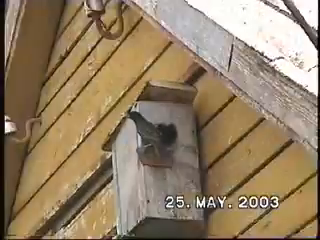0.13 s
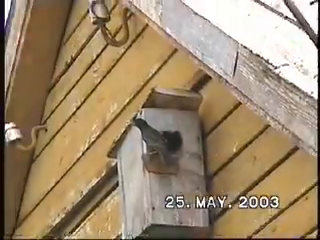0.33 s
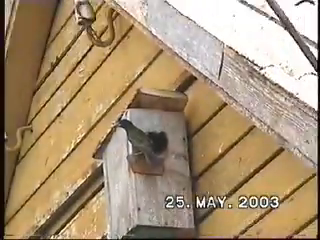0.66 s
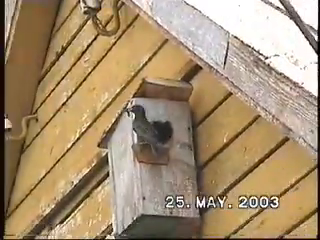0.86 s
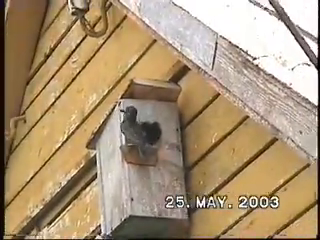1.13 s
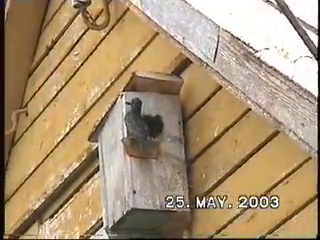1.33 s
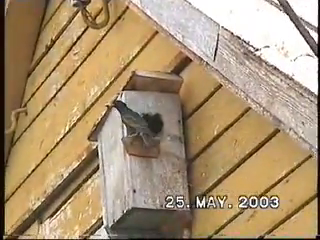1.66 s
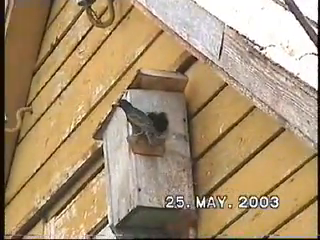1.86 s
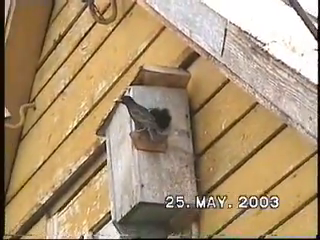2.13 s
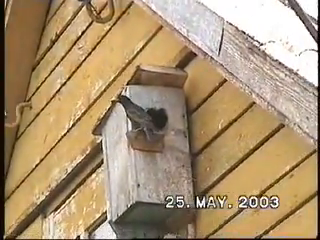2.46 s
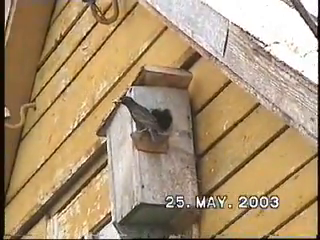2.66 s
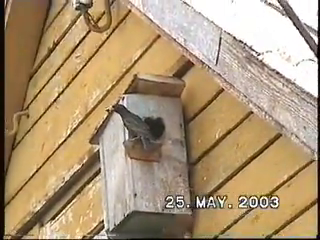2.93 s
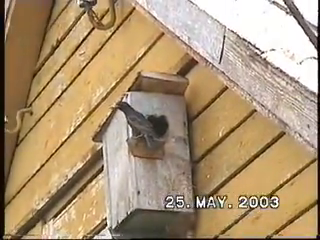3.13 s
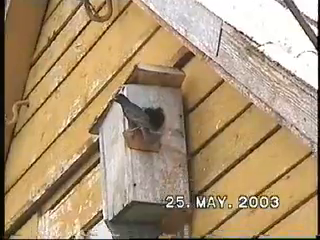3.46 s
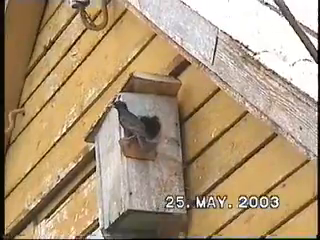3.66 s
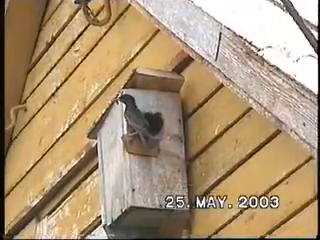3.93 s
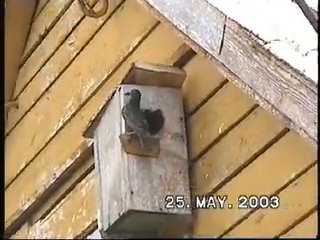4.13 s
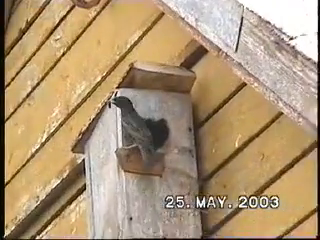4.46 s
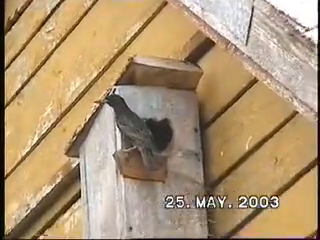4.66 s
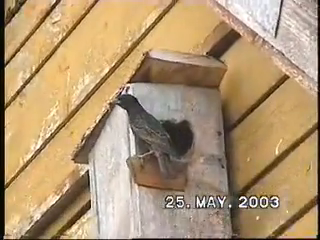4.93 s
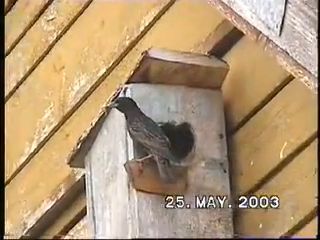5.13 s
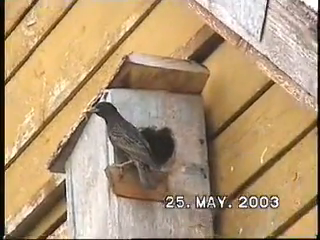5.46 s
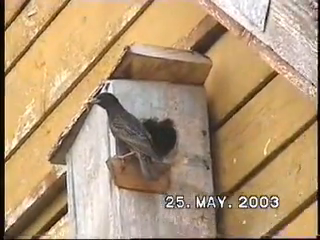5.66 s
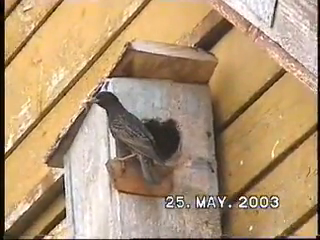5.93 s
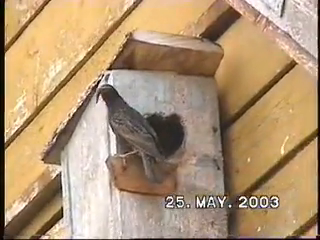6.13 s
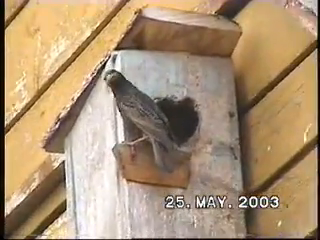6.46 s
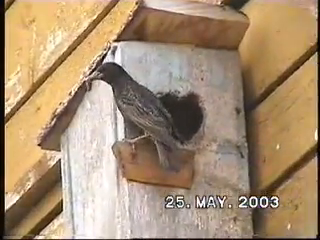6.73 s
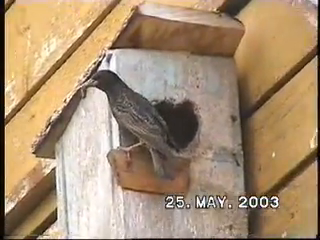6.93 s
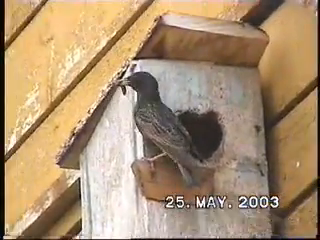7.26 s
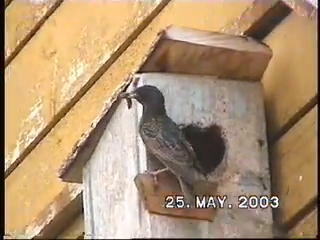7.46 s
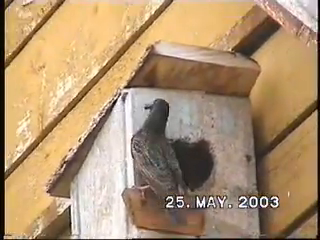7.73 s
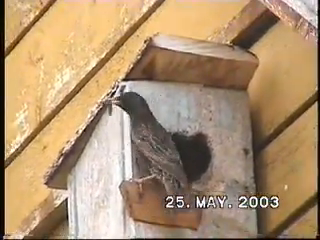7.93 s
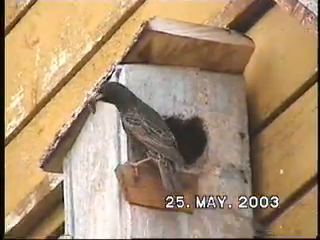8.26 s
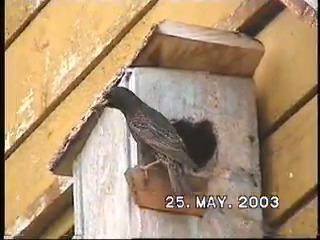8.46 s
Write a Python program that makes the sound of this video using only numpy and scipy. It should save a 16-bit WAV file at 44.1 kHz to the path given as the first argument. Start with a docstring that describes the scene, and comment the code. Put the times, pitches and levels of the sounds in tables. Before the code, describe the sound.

Short, bright starling chips and three rasping churrs, a hoarse four-part rooster crow, faint distant birds and hens, low gusts thumping the microphone.

```python
"""A yard with a wooden gable: a starling on its nest box gives sharp alarm chips and three harsh churrs.
A rooster crows across the yard in four syllables; small birds and hens call far off.
Chips and crow are harmonic series shaped by throat resonances, churrs are pulsed noise, far calls are
gliding sines, and a light wooden knock is a set of damped modes.
Gusts, as low-passed noise, buffet the microphone over a steady wash and a faint high whistle."""
import sys
import numpy as np
from scipy import signal
from scipy.fft import rfft, irfft, next_fast_len
from scipy.io import wavfile

SR = 44100
rng = np.random.default_rng(int(sys.argv[2]) if len(sys.argv) > 2 else 0)


def wav_record(signal):
    """Record a signal, one row per channel, as 16-bit PCM in the file named by sys.argv[1]."""
    frames = np.transpose(np.atleast_2d(signal))
    bounded = np.clip(frames, -1, 1)
    # unit amplitude maps onto the largest positive 16-bit level
    quanta = np.round(bounded * 32767).astype(np.int16)
    wavfile.write(sys.argv[1], SR, quanta)


N = 379701
T = np.arange(N) / SR

# the crow's syllables: start_s, length_s, release_s, fundamental_db, octave_db (before a trim),
# octave_swell_db, steady_rasp_db (before trims), pitch_hz, overshoot_hz, overshoot_after_s
CROW_SYLLABLES = [(2.646, 0.202, 0.095, -39, -19, 7, -31.5, 679, 24.7, .1),
                  (2.968, 0.2625, 0.079, -20, -16, 0, -34, 730, 57.94, 0.1),
                  (3.213, .42, 0.085, -19, -18.5, 8.5, -34, 744.5, 57.76, .105),
                  (3.718, .9, 0.24, -21.5, -20.5, 15.5, -69, 726.7, 42.2, 0.031)]
BREAK_RELEASE_S = 0.035


def amp(db):
    """Level law: decibels to amplitude gain."""
    return 10 ** (np.asarray(db) / 20)


def unit(x):
    """Normalization: scales to rms 1."""
    return x / np.sqrt(np.mean(x ** 2) + 1e-20)


def read(points, hz):
    """Spectral envelope: interpolates a table on a log-frequency axis."""
    f, value = np.transpose(points)
    return np.interp(np.log(hz + 1), np.log(f + 1), value)


def colour(x, points):
    """Linear filtering: weights the spectrum of x by a table, then scales to rms 1."""
    gain = amp(read(points, np.fft.rfftfreq(len(x), 1 / SR)))
    return unit(irfft(rfft(x) * gain, len(x)))


def wander(n, hz):
    """Band-limited random modulation: smooth noise with rates up to about hz, rms near 1."""
    size = next_fast_len(n + 4096)
    f = np.fft.rfftfreq(size, 1 / SR)
    spectrum = rfft(rng.standard_normal(size)) * np.exp(-(f / hz) ** 2)
    return unit(irfft(spectrum, size))[:n]


def swell(t, start, hold, rise, fall):
    """Exponential envelope: grows toward start, holds at 1, then decays."""
    return np.exp(np.minimum(t - start, 0) / rise - np.maximum(t - start - hold, 0) / fall)


def gate(t, length, attack, release):
    """Linear envelope: straight attack, hold and release within a length."""
    return np.clip(np.minimum(t / attack, (length - t) / release), 0, 1)


def add(mix, s, sound):
    """Superposition: adds a sound to the mix at time s."""
    part = mix[max(round(s * SR), 0):][:len(sound)]
    part += sound[:len(part)]


def echoes(x, t60, delay):
    """Diffuse reflection: sparse random echoes begin after a delay and decay by 60 dB in t60; energy 1."""
    t = np.arange(SR) / SR
    sparse = rng.choice([-1., 1.], SR) * (rng.random(SR) < 1 / 10)
    taps = sparse * amp(-60 * t / t60) * (t > delay)
    return signal.oaconvolve(x, taps / np.linalg.norm(taps))[:N]


def starling(gable_db=-11, yard_db=-23):
    """Reflection: chips and churrs are thrown back by the gable close behind and by the yard."""
    # alarm chips: start_s, length_s, level_db, final_pitch_hz, beak_factor on the throat's frequencies,
    # held_note (0-1)
    chip_rows = [(0.532, 0.054, -16.5, 1200, 0.99, 0.4), (0.921, 0.055, -12, 1287, 0.95, 0.8),
                 (1.639, 0.06, -17.5, 1232, 1, 0), (1.905, 0.057, -14, 1324, 1, 1.0),
                 (3.864, 0.059, -21.5, 1138, 0.96, 0), (4.527, 0.046, -19, 1145, 0.92, 0.25),
                 (5.113, 0.054, -16, 1230, 0.99, 0.4), (5.52, 0.058, -14.5, 1304, 1, 0.5),
                 (6.742, 0.05, -15.5, 1317, 0.95, 0.8), (7.284, 0.052, -20, 1186, 0.95, 0),
                 (7.646, 0.05, -14.5, 1267, 0.89, 1), (7.988, 0.064, -19, 1236, 0.86, 0.3),
                 (8.231, 0.063, -16.5, 1316, 0.95, 0.93)]
    # churrs: start_s, length_s, level_db and low_resonance_db (each before a trim) with the fade
    # between them, in the order start_s, length_s, level_db, fade_db, low_resonance_db
    churr_rows = [(2.19, 0.34, -28.5, -9, -41), (6.194, .34, -35, -4, -36.5), (8.392, .26, -36, -1, -42)]
    dry = np.zeros(N)
    for s, *shape in chip_rows:
        add(dry, s, chip(*shape))
    for s, *shape in churr_rows:
        add(dry, s, churr(*shape))
    gable = amp(gable_db) * echoes(dry, t60=0.21, delay=.002)
    yard = amp(yard_db) * echoes(dry, t60=0.63, delay=0.0084)
    return dry + gable + yard


def chip(length, db, top_hz, beak, held, start=.39, crest=.8, jitter=0.051, onset_db=-15,
         dull_db=-5, fade_db=-15, rasp_db=-13, flicker_db=5.5):
    """Source and filter: harmonics sweep up through fixed throat resonances and level off on a short note."""
    # resonances of the throat in a chip: frequency_hz, gain_db
    throat = [(800, -10), (1800, -23.5), (2450, -7.5), (3000, -15.5), (4000, -15.5), (5000, -6),
              (5700, -1.5), (6600, -0.5), (7300, -2), (8000, -4), (9000, -21.5), (11000, -27.5),
              (15000, -31.5)]
    # strengths of the harmonics, the fifth the strongest: multiple, gain_db
    orders = [(2, -20), (3, -9), (4, -7), (5, -1), (6, -1.5), (8, -8), (12, -10.5), (22, -2.5)]
    u = np.arange(int(length * SR)) / (length * SR)
    rise = np.minimum(u / crest, 1) ** 1.1
    unsteady = 1 + jitter * (1 - 0.82 * rise) * wander(len(u), 500)
    hz = top_hz * start ** (1 - rise) * unsteady
    phase = 2 * np.pi * np.cumsum(hz) / SR
    k = np.arange(2, 23)[:, None]
    # harmonics above the sixth start weak, and each harmonic flickers until the note settles
    late = dull_db * (k > 6) * np.maximum(1 - 3 * u, 0)
    flicker = flicker_db * (1 - rise ** 2) * wander(len(k) * len(u), 240).reshape(len(k), -1)
    gain = amp(read(throat, k * hz / beak) + read(orders, k) + late + flicker)
    gain = gain * (k * hz < SR / 2)
    stack = (gain * np.cos(k * phase + 2 * np.pi * rng.random(k.shape))).sum(0)
    rasp = colour(rng.standard_normal(len(u)), throat) * np.sqrt(np.sin(np.pi * u))
    effort = amp(np.interp(u, [0, .35, .65, 1], [onset_db, -2, 0, fade_db * (1 - held)]))
    voice = (unit(stack) + amp(rasp_db) * rasp) * effort * signal.windows.tukey(len(u), .2)
    return amp(db) * unit(voice)


def churr(length, db, fade_db, ring_db, pulse_hz=215, jitter=0.17, depth=0.27, low_hz=2430,
          low_width_hz=260, high_db=3.0, low_db=-1, uneven_db=1.0):
    """Amplitude modulation: uneven pulses chop a hiss that rings in the throat."""
    # resonances of the throat in a churr: frequency_hz, gain_db
    throat = [(900, -12), (1900, 1), (3000, 1), (3800, -3.5), (4600, 3.5), (5500, -0.5), (7000, 2),
              (8000, -1.5), (9000, -19.5), (12000, -24.5), (16000, -32)]
    t = np.arange(0, length, 1 / SR)
    # every churr opens with a 4 dB accent
    accent = 4 * np.exp(-((t - 0.043) / 0.011) ** 2)
    level = db + fade_db * t / length + accent
    turns = np.cumsum(pulse_hz * (1 + jitter * wander(len(t), 73))) / SR
    pulses = 1 - depth + depth * 3 * np.exp(-(turns % 1) / .3)
    puffs = rng.standard_normal(len(t)) * pulses
    band = signal.butter(2, [low_hz - low_width_hz, low_hz + low_width_hz], "band", fs=SR)
    ring = unit(signal.lfilter(*band, puffs))
    voice = amp(level + high_db) * colour(puffs, throat) + amp(ring_db + low_db) * ring
    uneven = amp(uneven_db * wander(len(t), 45))
    return voice * uneven * gate(t, length, attack=0.014, release=0.032)


def rooster(flutter=0.0095, shake=0.47, side_ratio=.585, side_jitter=0.0574, hiss_db=-3, rasp_db=4.5,
            chest_db=1, break_hz=728, octave_db=-0.94, yard_db=-16, edge_db=-10):
    """Beating oscillators: a clean tone is roughened where a second membrane beats against the first."""
    # the throat on the clean tone's overtones: frequency_hz, gain_db (against the octave)
    overtone_throat = [(2190, -26.5), (2920, -15.5), (3200, -60), (3640, -36), (3860, -11.5), (4400, -33.5),
                       (4750, -51), (5110, -19.5), (5800, -39.5), (6160, -22.5), (6600, -48.5)]
    # the throat when rasping: frequency_hz, gain_db
    rasp_throat = [(300, -23), (780, 4.5), (950, -10.5), (1170, -3.5), (1450, 7), (1750, -5), (2000, 3),
                   (2400, -21), (2950, -19.5), (3400, -19.5), (4100, -15), (6000, -19.5), (8000, -36)]
    # the hard edge of the rasp at high pitch: frequency_hz, gain_db
    edge_throat = [(3200, -36), (3850, 6), (4500, 4), (5600, -8), (6200, -10.5), (8000, -25.5)]
    # the low squawk: frequency_hz, gain_db
    chest_throat = [(300, -52), (435, -0.5), (500, -18.0), (595, 6.5), (680, -12.5), (900, -47)]
    last_s, last_length = CROW_SYLLABLES[-1][:2]
    t = np.arange(CROW_SYLLABLES[0][0], last_s + last_length + 2 * BREAK_RELEASE_S, 1 / SR)
    n = len(t)
    pitch, low, octave, rasp = crow_controls(t)
    rough = np.clip(5 * rasp / octave, 0, 1)
    hz = pitch * (1 + (0.0019 + flutter * rough ** 2) * wander(n, 117))
    phase = 2 * np.pi * np.cumsum(hz) / SR
    # the overtones fade together with the fundamental
    bright = np.minimum(2 * low / octave, 1) ** .5
    overtones = bright * sum(amp(read(overtone_throat, k * pitch) + 2 * wander(n, 22)) * np.cos(k * phase)
                             for k in range(3, 11))
    tone = low * np.cos(phase) + amp(octave_db) * octave * (np.sin(2 * phase) + overtones)
    tone *= np.sqrt(2) * (1 - 0.091 * rough + shake * rough * wander(n, 60))
    # the second membrane puts sidebands round every harmonic
    beat = 2 * np.pi * np.cumsum(side_ratio * hz * (1 + side_jitter * wander(n, 142))) / SR
    pulses = sum((1 + wander(n, 35) / 2) * np.cos(k * phase + wander(n, 70)) for k in range(1, 11))
    hiss = rng.standard_normal(n) * (1 + np.cos(phase))
    drive = unit(pulses * np.cos(beat)) + amp(hiss_db) * hiss
    # at low pitch the voice breaks into a low squawk
    slack = np.clip((break_hz - pitch) / 35, 0, 1)
    chest = slack * colour(rng.standard_normal(n), chest_throat)
    # at high pitch it takes on a hard edge
    edge = (1 - slack) * colour(drive, edge_throat)
    throaty = amp(rasp_db) * colour(drive, rasp_throat)
    hoarse = rasp * (throaty + amp(chest_db) * chest + amp(edge_db) * edge)
    dry = np.zeros(N)
    add(dry, t[0], (tone + hoarse) * signal.windows.tukey(n, .005))
    return dry + amp(yard_db) * echoes(dry, t60=0.83, delay=0.0026)


def crow_controls(t):
    """Breath control: pitch and the strengths of fundamental, octave and rasp follow effort and breaks."""
    # the voice breaks into a rasp: full_from_s, hold_s, attack_s (before full), rasp_db (before trims)
    breaks = [(2.673, 0.12, .01, -28.5), (2.976, .038, .004, -30.5), (3.075, 0.065, 0.012, -26.5),
              (3.302, 0.069, 0.023, -28), (3.471, 0.023, 0.0064, -26.5), (3.583, 0.042, .012, -27.5),
              (3.727, 0.036, 0.0036, -29), (4.431, 0.12, 0.048, -29.5)]
    pitch = np.zeros(len(t))
    low, octave, rasp = np.full((3, len(t)), 1e-4)
    for (s, length, release, low_db, octave_db, swell_db, rasp_db,
         hz, overshoot_hz, overshoot_s) in CROW_SYLLABLES:
        age = t - s
        effort = gate(age, length, attack=.022, release=release)
        # the pitch overshoots once, then sags as the air runs out, deeper in longer syllables
        overshoot = np.exp(-((age - overshoot_s) / .052) ** 2)
        sag = 40 * length * np.exp(np.minimum(age - length, 0) / .12)  # 40 Hz per second held
        pitch = np.where(age >= 0, hz + overshoot_hz * overshoot - sag, pitch)
        # in a long-held note the fundamental drops by 15 dB and the octave dominates
        thin_db = -15 * np.clip((age - 0.493) / 0.077, 0, 1)
        low = low + effort * amp(low_db + thin_db)
        octave = octave + effort * amp(octave_db + swell_db * np.clip(age / length, 0, 1) + 5 * overshoot)
        rasp = rasp + effort * amp(rasp_db)
    for s, length, attack, db in breaks:
        broken = swell(t, s, length, attack, BREAK_RELEASE_S)
        duck = amp(-5.5 * broken)  # the clean tone dips during a break
        low, octave = low * duck, octave * duck
        rasp = np.maximum(rasp, amp(db) * broken)
    return pitch, low, octave, rasp


def knocks(tick_t60=0.023, wet=0.19):
    """Modal decay: one light knock rings the damped modes of wood, beside two dry noise ticks."""
    # modes of the wood: frequency_hz, level_db (relative), t60_s
    modes = [(666, -3, 0.059), (920, -6, 0.055), (1140, 0.5, .05), (1390, 8, 0.021), (1560, -3, 0.041),
             (2700, -5, 0.018)]
    # small dry ticks: start_s, onset_level_db
    tick_rows = [(1.373, -36), (5.803, -30)]
    snap_spectrum = [(1000, -17), (4000, -8), (7500, 5), (11000, -6), (15000, -22)]  # Hz, dB
    t, dry = np.arange(SR // 8) / SR, np.zeros(N)
    ringing = sum(amp(db - 60 * t / t60) * np.sin(2 * np.pi * (hz * t + rng.random()))
                  for hz, db, t60 in modes)
    add(dry, 1.3725, amp(-19) * ringing / 2)
    for s, db in tick_rows:
        snap = colour(rng.standard_normal(len(t)), snap_spectrum)
        add(dry, s, amp(db - 60 * t / tick_t60) * snap)
    return dry + wet * echoes(dry, t60=0.075, delay=0.005)


def far_calls(rows, level_db, trill_hz, swing, wet):
    """Frequency modulation: gliding whistles, some trilled, are blurred by strong reflections."""
    dry = np.zeros(N)
    for s, length, first_hz, last_hz, db, trill in rows:
        n = int(length * SR)
        shiver = np.sin(2 * np.pi * np.cumsum(trill_hz * (1 + 0.22 * wander(n, 32.0))) / SR)
        trilled = swing * trill * (shiver + 0.76 * wander(n, 380))
        hz = np.geomspace(first_hz, last_hz, n) * (1 + trilled + 0.0046 * wander(n, 200))
        note = np.sin(2 * np.pi * np.cumsum(hz) / SR) * (1 + 0.1 * trill * shiver)
        add(dry, s, amp(db + level_db) * unit(note * signal.windows.tukey(n, .5)))
    return dry + wet * echoes(dry, t60=0.2, delay=0.0045)


def poultry():
    """Frequency glides: far hens as low whistles with a slow trill."""
    # far calls: start_s, length_s, first_hz, last_hz, level_db (before the trim), trill (0-1)
    hen_rows = [(4.97, 0.17, 1210, 1213, -54, 0.15), (5.96, .15, 1200, 1210, -57, 0.2),
                (6.31, 0.077, 722, 723, -46.5, 0.56), (6.84, .19, 770, 797, -51, 0.8),
                (6.92, 0.071, 1120, 1010, -53.5, 0.7), (7.16, .05, 990, 1040, -54, 0.2),
                (7.18, 0.065, 827, 840, -49, 0.26), (7.37, 0.1, 832, 780, -52, 0.8)]
    return far_calls(hen_rows, level_db=5.5, trill_hz=25.2, swing=0.069, wet=1.0)


def songbirds():
    """Frequency glides: far small birds as high whistles with a faster trill."""
    return far_calls([*songbird_notes(), *chatter()], level_db=-2, trill_hz=42, swing=.04, wet=.6)


def songbird_notes():
    """Glide contours: slurs, peeps and bouts of trills as rows of timing, pitches, level and trill."""
    # falling slurs: start_s, level_db (before the trim)
    slurs = [(.72, -49), (2.58, -47), (2.925, -52), (5.9, -54), (7.4, -45), (7.5, -52), (7.765, -46)]
    # short peeps: start_s, glide_hz, level_db (before the trim)
    peeps = [(2.02, 200, -46), (2.43, -600, -42), (6.13, -450, -45), (6.62, 50, -47), (7.0, 200, -46),
             (7.21, 250, -45)]
    # bouts of trilled notes: start_s, length_s, pitch_hz (centre), level_db (mean, before the trim)
    twitters = [(.26, .12, 3480, -47), (1.23, .09, 4400, -46), (1.39, .07, 3950, -44),
                (1.52, .07, 3700, -45), (4.8, .16, 4400, -46), (5.22, .2, 3500, -44),
                (5.25, .13, 4600, -43), (6.82, .12, 3450, -47), (7.35, .2, 3650, -45),
                (8.06, .07, 4650, -40)]
    peep_s, peep_hz = 0.11, 4360
    trill_s, every_s, scatter, uneven_db = 0.023, 0.02, 0.0404, 4
    notes = [(s, 0.077, 3700, 2720, db, 0.52) for s, db in slurs]
    notes += [(s, peep_s, peep_hz - glide / 2, peep_hz + glide / 2, db, 0) for s, glide, db in peeps]
    for s, length, hz, db in twitters:
        for age in np.arange(0, length - trill_s / 2, every_s):
            first, last = hz * (1 + scatter * rng.standard_normal(2))
            notes.append((s + age, trill_s, first, last, db + uneven_db * rng.standard_normal(), 1))
    return notes


def chatter(count=18, hz=4100, db=-56):
    """Random timing: faint chance chirps from birds still farther off, as rows of notes."""
    when, length, first, last = rng.random((count, 4)).T
    one = np.ones(count)
    first_hz = hz * (0.99 + 0.1 * first)
    last_hz = hz * (0.98 + 0.41 * last)
    return np.transpose([when * N / SR, 0.095 + 0.043 * length, first_hz, last_hz, db * one, one])


def wind(level_db=-1, lumps_db=3, top_hz=400):
    """Turbulence: lumpy low-passed noise at the microphone follows the summed power of breeze and gusts."""
    # turbulence spectrum before the low-pass: frequency_hz, density_db (per Hz, relative)
    eddy_spectrum = [(11, -35), (18, -6.5), (53, -5), (102, 0), (167, -9.5), (243, -15.5), (334, -21),
                     (389, -32), (429, -23.5), (500, -30), (650, -67), (1100, -120)]
    # strength of the breeze: time_s, level_db (before the trim)
    breeze = [(0, -43), (.9, -42), (2.9, -35.5), (3.2, -28), (5.15, -29), (5.45, -41.5), (5.75, -36.5),
              (5.95, -52.5), (7, -43.5), (8.6, -52.5)]
    # gusts on top of it: peak_s, rise_s, level_db (before the trim)
    gusts = [(1.13, 0.13, -30), (1.27, 0.015, -22), (1.5, 0.041, -29), (1.86, 0.059, -31),
             (2.22, 0.017, -27.5), (2.62, 0.07, -32.5), (3.42, 0.16, -23), (4.28, 0.092, -25),
             (6.78, 0.021, -20.5)]
    low_pass = signal.butter(3, top_hz, fs=SR, output="sos")
    eddies = signal.sosfilt(low_pass, colour(rng.standard_normal(N), eddy_spectrum))
    power = amp(np.interp(T, *np.transpose(breeze))) ** 2
    # a gust dies 3.3 times more slowly than it rises
    power = power + sum((amp(db) * swell(T, s, 0, rise, 3.3 * rise)) ** 2 for s, rise, db in gusts)
    return unit(eddies * amp(lumps_db * wander(N, 17))) * np.sqrt(power) * amp(level_db)


def air(level_db=-38.5, whistle_db=-57.5):
    """Stationary noise: a steady outdoor wash and hiss, with a faint pure tone high above."""
    # spectrum of the wash: frequency_hz, density_db (per Hz, relative)
    wash_spectrum = [(20, 0), (60, -19), (130, -8), (300, -9), (550, -9.5), (900, -13), (1800, -16.5),
                     (3200, -19), (4200, -18), (7000, -21), (9000, -29), (11000, -33), (15600, -35)]
    wash = amp(level_db) * colour(rng.standard_normal(N), wash_spectrum)
    whistle = np.sqrt(2) * np.sin(2 * np.pi * 15625 * T)
    return wash + amp(whistle_db) * whistle


def scene():
    """Superposition: all sources add at one microphone."""
    birds = starling() + rooster() + songbirds() + poultry()
    return (birds + knocks() + wind() + air())[None]


def record(dry, ceiling=.9, edge_hz=15800):
    """Saturation and band limit: the loudest peaks are rounded off, then a low-pass ends the spectrum."""
    held = dry / (1 + (dry / ceiling) ** 6) ** (1 / 6)
    low_pass = signal.firwin(1023, edge_hz, window=("kaiser", 9), fs=SR)
    return signal.oaconvolve(held, low_pass[None], "same")


dry = scene()
out = record(dry)
wav_record(out)
```